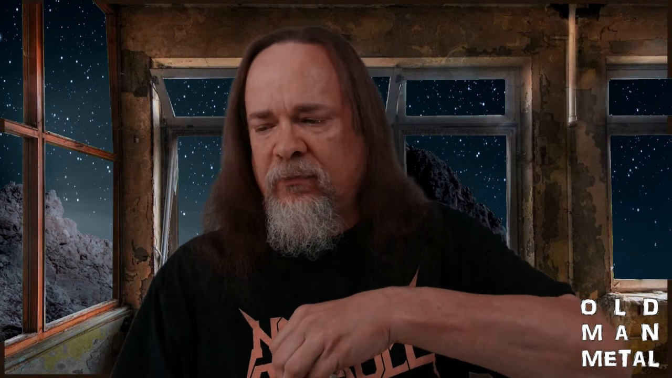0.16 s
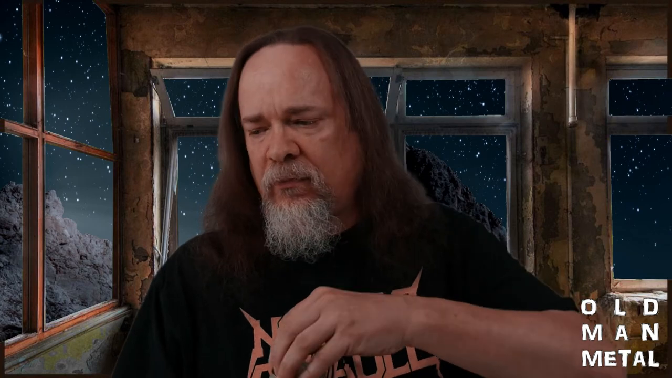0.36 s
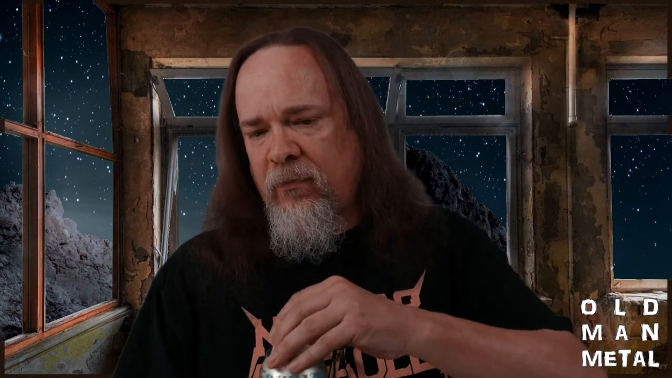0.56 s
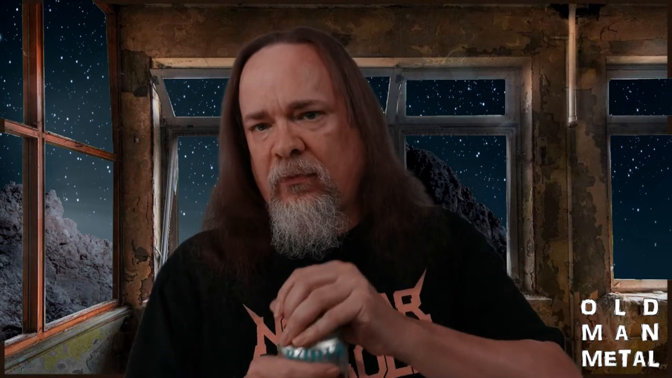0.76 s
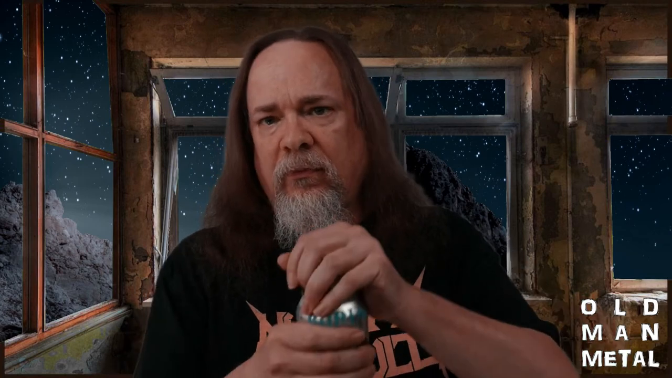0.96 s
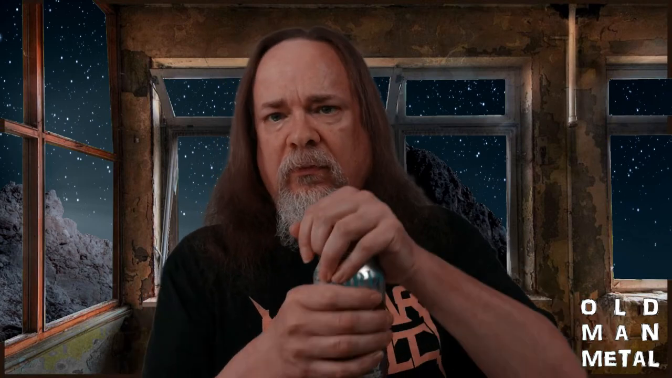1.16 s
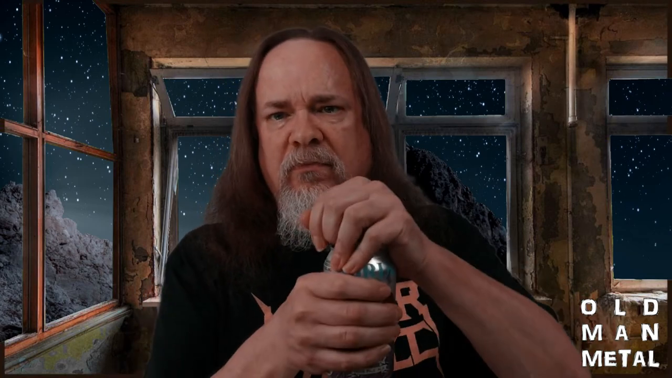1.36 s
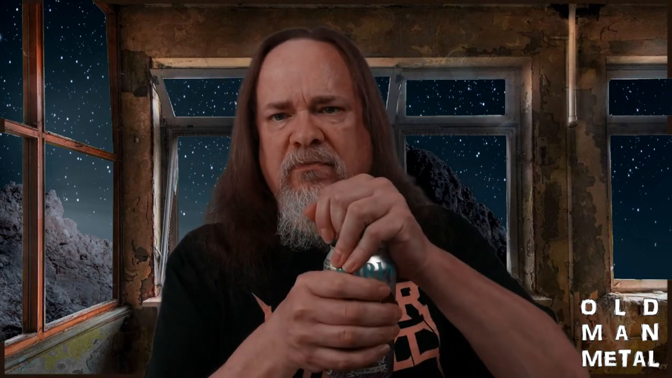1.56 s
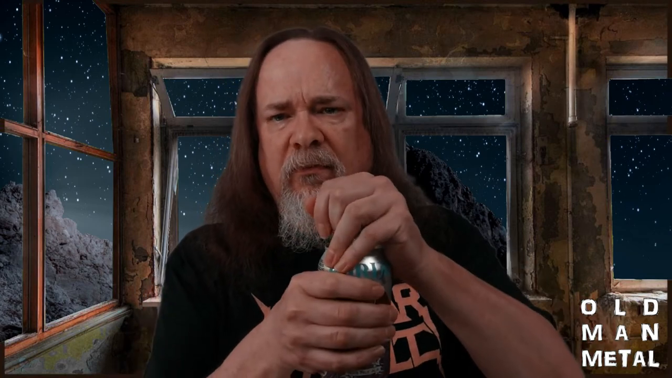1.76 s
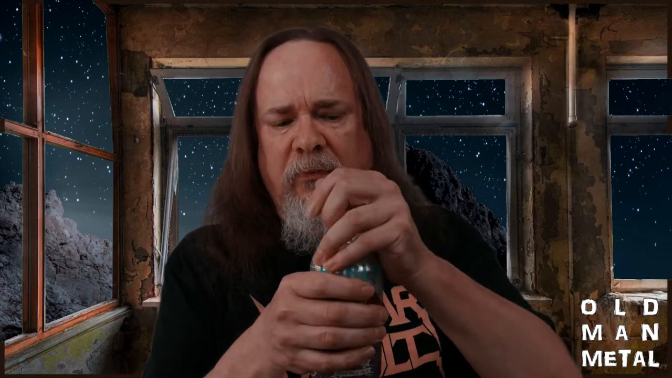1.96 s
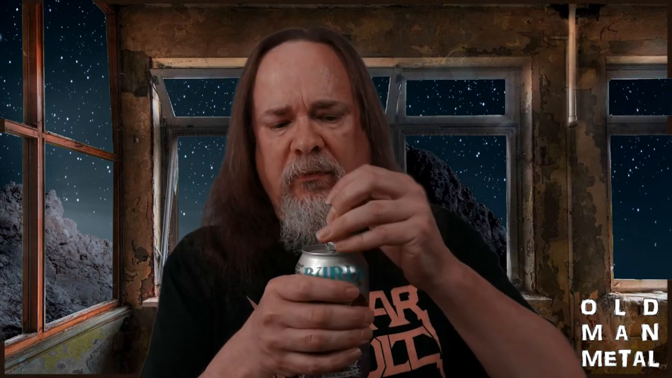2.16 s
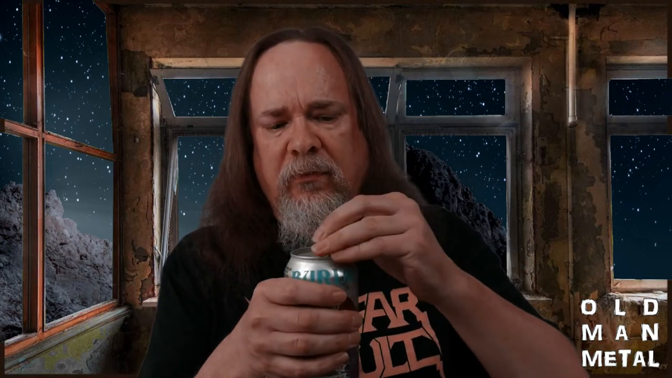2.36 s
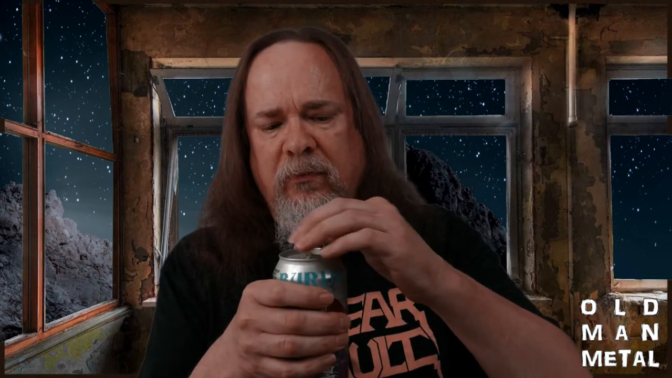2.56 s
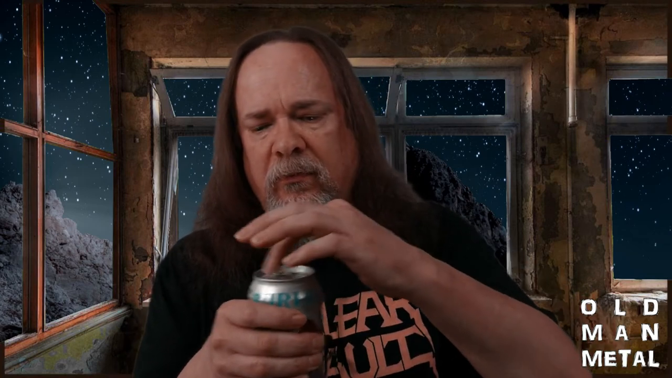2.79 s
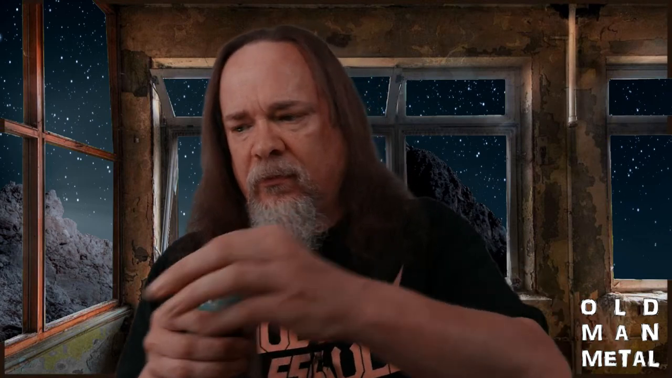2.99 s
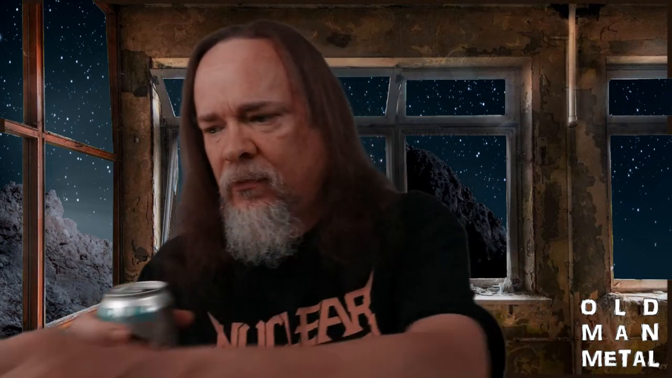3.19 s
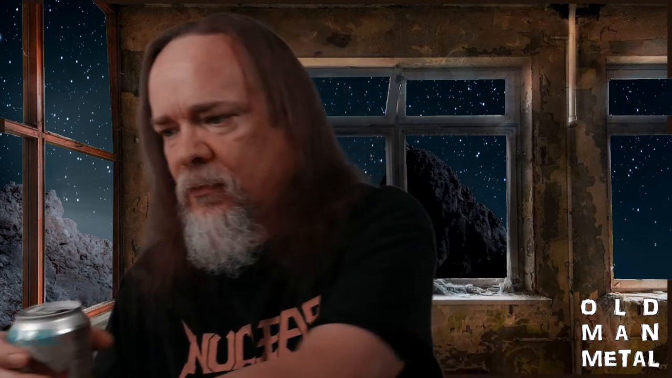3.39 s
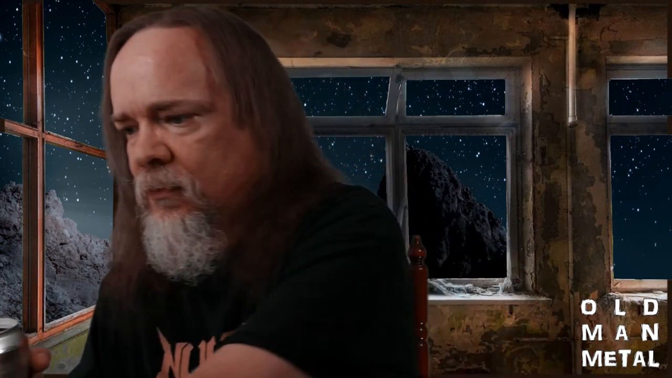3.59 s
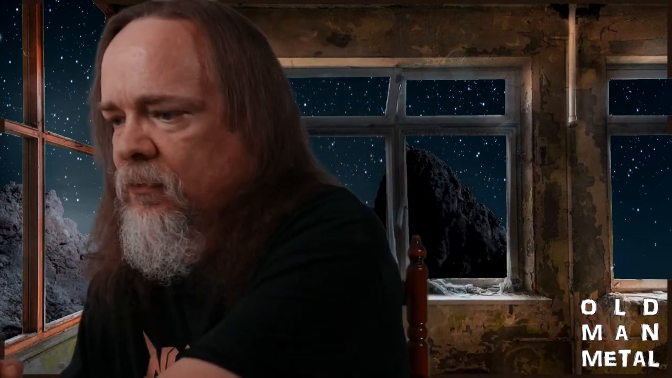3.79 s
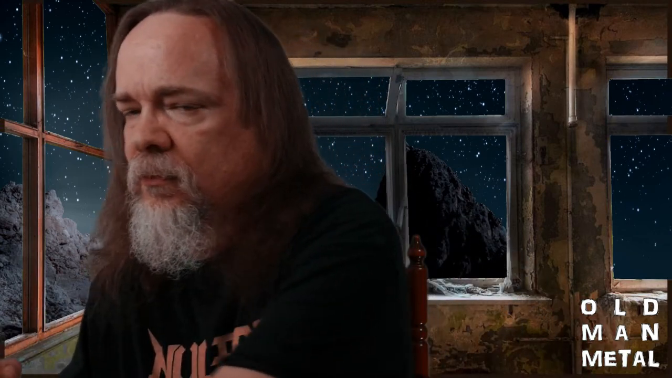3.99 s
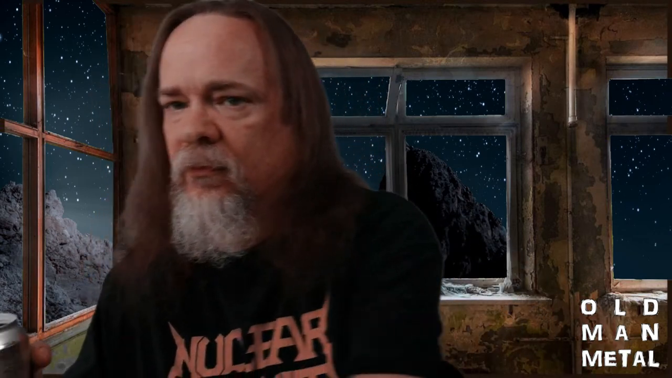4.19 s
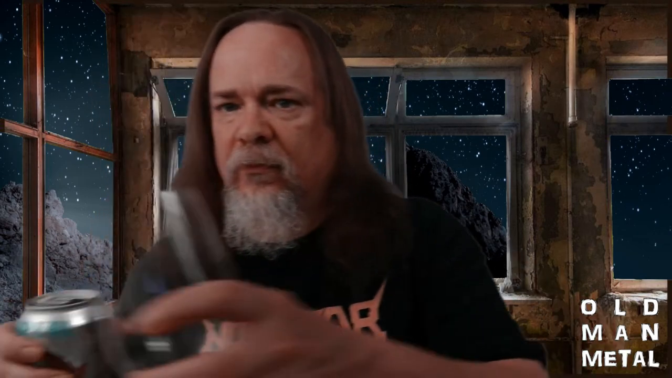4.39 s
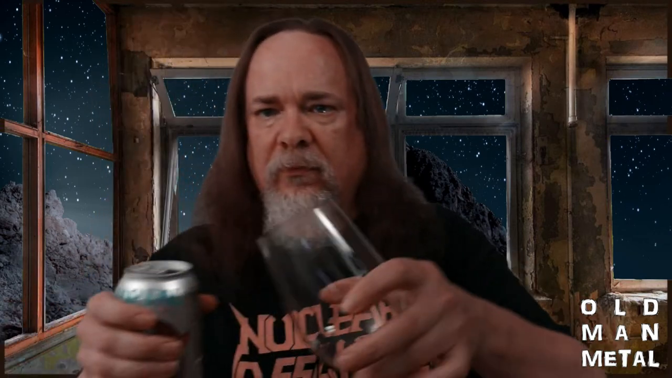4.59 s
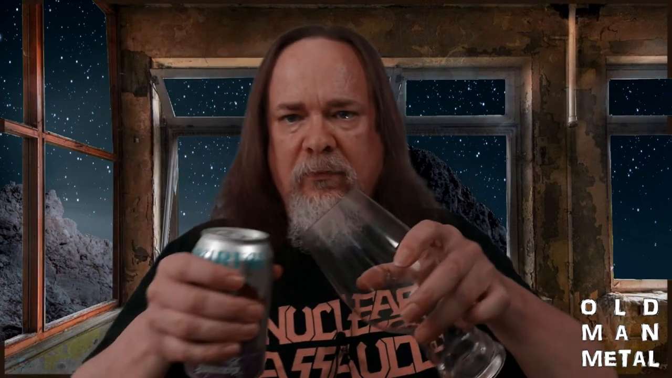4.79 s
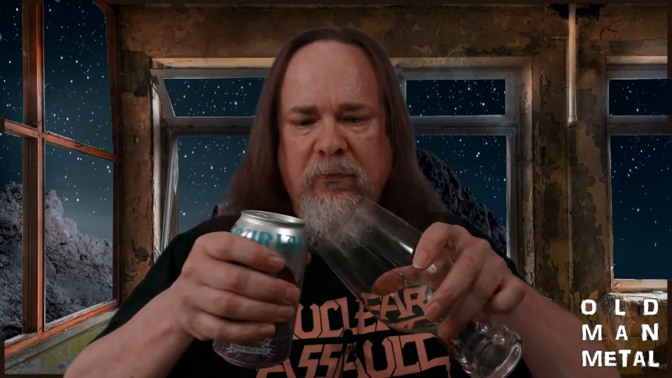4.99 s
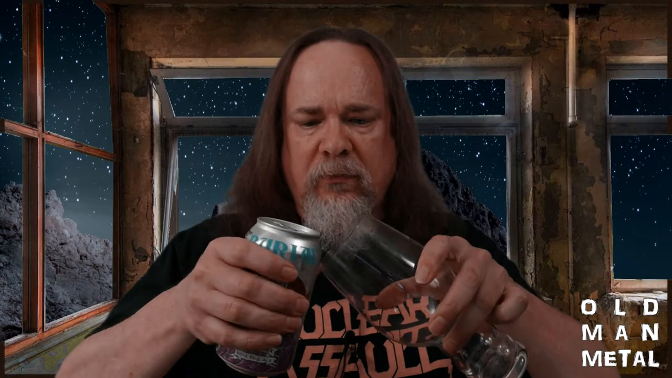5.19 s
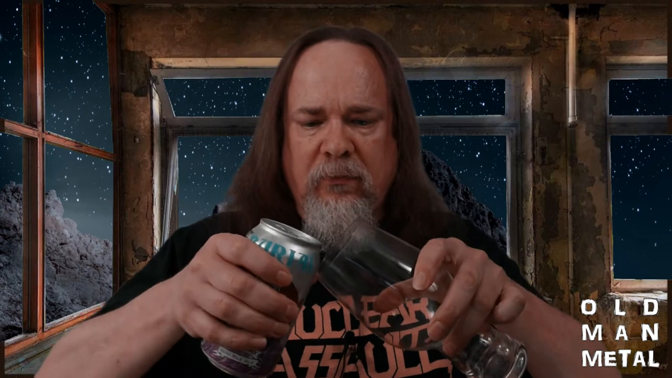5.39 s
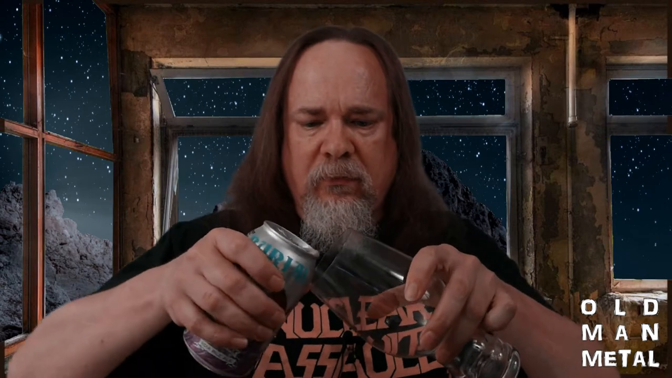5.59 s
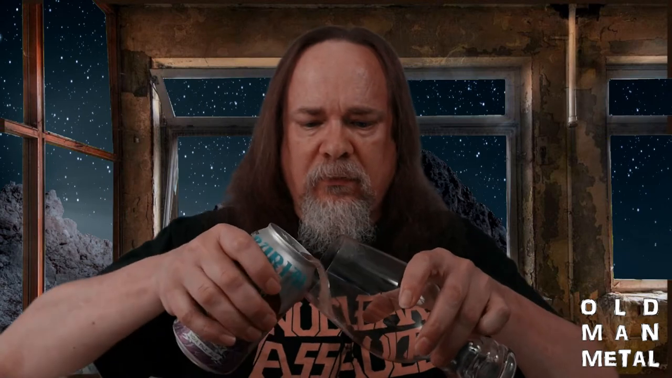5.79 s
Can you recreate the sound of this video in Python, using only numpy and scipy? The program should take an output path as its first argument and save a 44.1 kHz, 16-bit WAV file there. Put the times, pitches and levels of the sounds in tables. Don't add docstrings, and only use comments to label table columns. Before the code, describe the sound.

A quiet small room with low rumble and faint hiss, heard by two close microphones. From 0.3 s a fingernail ticks on a can tab; the strongest pluck, at 0.42 s, twangs brightly around 2 kHz. Weak touches follow at 0.67 and 0.83 s. At 1.45 s the vent cracks sharply with a gas jet lasting about 40 ms. From 1.55 to 1.63 s the lid tears in a rattling run of metallic cracks, loudest at 1.62 s, with fizz that dulls and dies by about 1.8 s; the background dips then returns. At 2.0 s the released tab gives a small hollow clunk, followed by faint bending clicks until 2.8 s. From 3.1 to 3.9 s a wooden chair creaks and knocks, duller and roomier, amid cloth rustle. Around 4.0-4.3 s a glass squeaks barely audibly; softer knocks come at 4.4-4.7 s, with one at 4.64 s clearest. A tiny finger tap sounds at 5.16 s, then faint rustling.

```python
import sys
import numpy as np
from scipy import signal
from scipy.fft import rfft, irfft, next_fast_len
from scipy.io import wavfile
from scipy.ndimage import uniform_filter1d, minimum_filter1d

SR = 44100
rng = np.random.default_rng(int(sys.argv[2]) if len(sys.argv) > 2 else 0)


def ratio_of_db(decibels):
    return 10 ** (np.asarray(decibels, float) / 20)


def store_wav(level_fs):
    pcm = np.round(np.clip(np.atleast_2d(level_fs), -1, 1) * 32767)
    wavfile.write(sys.argv[1], SR, pcm.T.astype(np.int16))


N = 257984


def rms_one(x):
    return x / np.sqrt(np.mean(x ** 2) + 1e-20)


def peak_one(x):
    return x / np.max(np.abs(x))


def add(out, s, sound):
    i = round(s * SR)
    out[i:i + len(sound)] += sound[:N - i]


def high_pass(x, order, hz):
    return signal.sosfilt(signal.butter(order, hz, "high", fs=SR, output="sos"), x)


def in_time(rows):
    s, *columns = np.transpose(rows)
    return [np.interp(np.arange(N) / SR, s, c) for c in columns]


def at_hz(points, hz):
    point_hz, value = np.transpose(points)
    return np.interp(np.log(hz), np.log(point_hz), value)


def coloured(spectrum, size):
    fast = next_fast_len(size)
    hz = np.arange(fast // 2 + 1) * SR / fast + 1e-3
    inside = (hz > spectrum[0][0]) & (hz < spectrum[-1][0])
    white = rfft(rng.standard_normal(fast))
    return rms_one(irfft(white * ratio_of_db(at_hz(spectrum, hz)) * inside, fast)[:size])


def drift(rate):
    knots = rng.standard_normal(400)
    return np.interp(np.arange(N) / SR * rate, np.arange(400), knots)


def swells(rows):
    t = np.arange(0, N / SR, .0005)
    power = 0
    for s, db, rise, fall in rows:
        power = power + ratio_of_db(2 * (db - np.where(t < s, rise * (s - t), fall * (t - s))))
    return np.interp(np.arange(N) / SR, t, 10 * np.log10(power + 1e-30))


def ring(force, hz, t60):
    r, w = ratio_of_db(-60 / (t60 * SR)), 2 * np.pi * hz / SR
    return signal.lfilter([0, np.sin(w)], [1, -2 * r * np.cos(w), r * r], force + 1e-18)


# frequency in Hz, level in dB.
LID_MODES = [(520, -6), (790, -2), (1100, -7.5), (1310, -2.5), (1480, -10.5), (1670, 2), (1860, -9.5),
             (2070, 9), (2280, -8), (2620, -4.5), (2900, -5.5)]
# frequency in Hz, level in dB.
RIM_MODES = [(4250, -5.5), (4650, -0.5), (5250, -3.5), (5900, -3), (6300, -0.5), (6880, -2.5), (7300, -2),
             (8000, -6), (8600, -4), (9500, -5), (10450, -5), (11350, -7), (12450, -8.5), (13450, -6.5)]
PANEL_TOP_HZ = 3100


def lid(force, ring_s, centre_hz, edge_hz, chance, tilt_db=0):
    panel, rim = 0, 0
    strength_db, detune = 2.5 * chance[:2], 1 + .012 * chance[2:]
    for k, (hz, db) in enumerate(LID_MODES):
        near_db = -12.0 * np.log2(hz / centre_hz) ** 2
        panel = panel + ratio_of_db(db + near_db + strength_db[0, k]) * ring(force, hz * detune[0, k], ring_s)
    for k, (hz, db) in enumerate(RIM_MODES):
        gain = ratio_of_db(db + tilt_db * np.log2(hz / 7000) + strength_db[1, k]) * (-1) ** k
        rim_ring_s = ring_s * 0.38 * (6000 / hz) ** 0.098
        rim = rim + gain * ring(force, hz * detune[1, k], rim_ring_s)
    panel = signal.sosfilt(signal.butter(4, PANEL_TOP_HZ, fs=SR, output="sos"), panel)
    rim = rim + ratio_of_db(5.5) * np.diff(force, n=2, prepend=[0, 0])
    return high_pass([panel, rim], 6, edge_hz)


def contacts(rows, panel_at, ring_s, snap, dull_hz):
    out, t = np.zeros(N), np.arange(3000) / SR
    soft = signal.butter(1, min(dull_hz, 20000), fs=SR, output="sos")
    for s, db, treble_db, contact_ms, tilt_db in rows:
        noise, chance = rng.standard_normal(3000), rng.standard_normal((4, 22))
        fade = np.exp(-(t * 750 / max(contact_ms, .05)) ** 1.5)
        force = signal.sosfilt(soft, np.where(t == 0, snap, noise) * fade)
        panel, rim = lid(force, ring_s, *panel_at(s, db), chance, tilt_db)
        add(out, s, ratio_of_db(db) * (peak_one(panel) + ratio_of_db(treble_db) * peak_one(rim)))
    return out


# start in seconds, lid peak in dB, treble above lid in dB, contact in ms, treble tilt in dB/octave.
VENT_CRACK = [
    (1.4481, -16, 6.5, 0.2, -3),
]


def vent_crack():
    return contacts(VENT_CRACK, lambda s, db: (1900, 1400), 0.011, snap=9.0, dull_hz=16000)


# start in seconds, lid peak in dB, treble above lid in dB, contact in ms, treble tilt in dB/octave.
TEAR = [(1.5463, -24.5, 1.5, 5, -1.5), (1.5542, -18, 5, 0.66, 1.5), (1.5625, -21, -1, 2.9, 1.5),
        (1.5735, -28.5, 3, 2.8, -5), (1.5802, -17, 1.5, .7, -3), (1.5857, -19, -2.5, 2.3, -3.5),
        (1.6050, -20, -4.5, 1.5, -4), (1.6168, -13, -1.5, 3.5, -1), (1.6212, -8, -2.5, 0.72, -0.46),
        (1.6238, -6, 2.5, 1.4, -2.5), (1.6318, -21, 0.5, 2.1, -3.5), (1.6575, -29, -7.5, 1.9, -4.5),
        (1.7412, -43, -1.5, 1.2, -12.5)]


def tear():
    def slack_panel(s, db):
        return 1900, 640 * (1 - .05 * db)
    return contacts(TEAR, slack_panel, .0095, snap=13.0, dull_hz=16000)


# start in seconds,
# lid peak in dB, treble above lid in dB, contact in ms, treble tilt in dB/octave.
NAIL = [(0.293, -56, -9, 2.5, -5), (0.3455, -46, 5, .6, 1.5), (0.3567, -59, 12, 3.3, -23),
        (0.368, -50, 7, 3.5, -1.5), (0.3838, -44, 6, .7, 3), (0.4202, -30.5, 9, 2.2, 0.2),
        (0.4467, -44, -4, 10, -20), (0.6694, -41.5, 1, 1.7, -11), (0.8295, -48, -14, 3.1, -3),
        (0.8344, -48.5, 5, 2, -1), (0.8864, -58, -14, 7.5, -4)]
BEND = [(1.8324, -61, -11, 0.88, -1.5), (2.0612, -50.5, 1.5, 1.87, 9), (2.1021, -54, -2, 1.64, 7),
        (2.4221, -32, -36, 0.45, 2), (2.4334, -46, -16, 11, 3.5), (2.5628, -55, -20, .6, -1.5),
        (2.572, -53, -17, .6, -3), (2.6764, -43, -9, 1.5, -.7), (2.692, -50.5, 5.5, 1.8, 11),
        (2.7028, -47, -3, 1.5, 10), (2.7686, -38.5, -11.5, 1.1, 1), (2.8292, -58.5, -3.5, 1.9, -1.5)]
TOUCH = [
    (1.9963, -46, -7, 2.1, 8),
    (5.1613, -51, 2, 2.14, 9.5),
    (5.1652, -47.5, -15.5, 0.37, -3),
    (5.1671, -49, -13, 0.44, -3),
    (5.1693, -48, -13, .4, -3),
]


def finger_taps():
    nail = contacts(NAIL, lambda s, db: (2200, 290), 0.014, snap=4.0, dull_hz=15000)
    bend = contacts(BEND, lambda s, db: (2250, 1510), 0.02, snap=11.6, dull_hz=7190)
    touch = contacts(TOUCH, lambda s, db: (1950, 1080), .011, snap=3.8, dull_hz=9000)
    return nail + bend + touch


# start in seconds, rms at the start in dB, decay in ms.
SNAPS = [(.3455, -46, 1.2), (.3685, -52, 4), (.3838, -44, 1.2), (.4208, -31, 2), (1.4481, -13, 1.6),
         (1.4503, -21, 2), (1.5463, -30, 3), (1.5542, -18, 1.8), (1.5625, -30, 2.5), (1.5802, -21, 1.5),
         (1.586, -26, 3), (1.6052, -28, 2), (1.6168, -22, 3), (1.6208, -20, 2), (1.6236, -12.5, 2.2),
         (1.632, -29, 5), (1.6415, -34, 3)]


def snaps():
    out, t = np.zeros(N), np.arange(1500) / SR
    band = signal.butter(2, [3700, 11500], "band", fs=SR, output="sos")
    for s, db, ms in SNAPS:
        burst = rms_one(signal.sosfilt(band, rng.standard_normal(1500)))
        add(out, s, ratio_of_db(db) * burst * np.exp(-t * 1000 / ms))
    return out


# peak time in seconds, peak in dB, rise in dB/s, fall in dB/s.
RUBS = [(0.3, -81, 650, 300), (0.36, -66, 301, 260), (.4205, -42, 3000, 1300), (0.39, -62, 900, 500),
        (0.45, -57, 153, 700), (0.67, -57.5, 1800, 650), (0.81, -70, 1100, 600), (2.058, -67, 500, 400),
        (0.663, -66, 700, 400)]
STRAIN = [
    (1.475, -45.5, 401.5, 91),
    (1.55, -37, 901, 249),
    (1.585, -38.5, 400, 297),
    (1.63, -35, 399, 400),
]
RUB_TREBLE_DB, STRAIN_TREBLE_DB = 3.5, -9
HANDS_OFF_S, SLIPS_PER_S = 2.3, 2500


def grind():
    size = round(HANDS_OFF_S * SR)
    sizes = ratio_of_db(4.5 * np.minimum(rng.exponential(1, size), 3)) * rng.choice([-1, 1], size)
    slips = sizes * (rng.random(size) < SLIPS_PER_S / SR)
    panel, rim = lid(slips, 0.019, 1600, 460, np.zeros((4, 22)))
    rub, strain = ratio_of_db(swells(RUBS)[:size]), ratio_of_db(swells(STRAIN)[:size])
    treble = rub * ratio_of_db(RUB_TREBLE_DB) + strain * ratio_of_db(STRAIN_TREBLE_DB)
    return np.pad((rub + strain) * rms_one(panel) + treble * rms_one(rim), (0, N - size))


# time in seconds, jet level in dB.
VENT = [
    (1.421, -103),
    (1.427, -43),
    (1.446, -31.5),
    (1.451, -22.5),
    (1.468, -26.5),
    (1.480, -30.5),
    (1.491, -46),
    (1.52, -57.5),
    (1.56, -76.5),
]
# frequency in Hz, level in dB per Hz.
LEAK = [(300, -26), (800, -20), (1400, -1.5), (3000, -2.5), (4500, -5.5), (7000, -1.5), (10000, -1.5),
        (16000, -2.5)]
JET = [(760, -35), (1300, -7), (2170, -4.5), (3640, -18), (4540, -13), (5900, -7.5), (6220, -4.5),
       (6910, -15), (8700, -1), (11200, -15.5), (12800, -13), (16000, -12)]
# peak time in seconds, peak in dB, rise in dB/s, fall in dB/s.
GURGLE = [
    (1.468, -41, 1200, 500),
]
PUFF_DB, PUFF_FOLLOWS, PUFF_LAG_S = -41, 0.77, 0.0016


def vent():
    jet_db, = in_time(VENT + [(VENT[-1][0] + .02, -120)])
    puff_db = PUFF_DB + PUFF_FOLLOWS * (np.roll(jet_db, round(PUFF_LAG_S * SR)) + 24.5)
    before_crack = np.arange(N) < VENT_CRACK[0][0] * SR
    jet = np.where(before_crack, coloured(LEAK, N), coloured(JET, N))
    puff = coloured([(30, -6), (95, -10), (200, -6.5), (330, -14), (600, -28)], N)
    gurgle = ratio_of_db(swells(GURGLE)) * coloured([(300, -3), (600, -1.5), (1200, -4)], N)
    return ratio_of_db(jet_db) * jet + ratio_of_db(puff_db) * puff + gurgle


# frequency in Hz, level in dB per Hz.
FIZZ = [(260, -56.5), (450, -26), (792, -6.5), (1180, -13), (1880, -3), (2770, -13.5), (3900, -9.5),
        (5170, -17), (9520, -12.5), (13800, -22), (16300, -30)]
FROTH_START_S, FROTH_START_MS, FROTH_PEAK_S = 1.515, 45, 1.625
PATCHY_DB, SPLIT_HZ, TREBLE_LOSS_DB_PER_S = 3.5, 7300, 120


def froth():
    t = np.arange(N) / SR
    start = np.clip((t - FROTH_START_S) * 1000 / FROTH_START_MS, 0, 1) ** 2
    fizz = coloured(FIZZ, N)
    low = signal.sosfiltfilt(signal.butter(2, SPLIT_HZ, fs=SR, output="sos"), fizz)
    treble_db = PATCHY_DB * drift(90) - TREBLE_LOSS_DB_PER_S * np.maximum(t - FROTH_PEAK_S, 0)
    fizz = ratio_of_db(PATCHY_DB * drift(66)) * low + ratio_of_db(treble_db) * (fizz - low)
    level_db = swells([(FROTH_PEAK_S, -32.5, 102.5, 190)])
    return start * ratio_of_db(level_db) * fizz


def lone_modes(rows, rise_ms, curve, edge_hz, rough_hz=0, glide_per_s=0):
    out, t = np.zeros(N), np.arange(12000) / SR
    for s, db, hz, t60 in rows:
        envelope = (1 - np.exp(-t * 1000 / rise_ms)) * ratio_of_db(-60 * (t / t60) ** curve)
        wander = np.cumsum(rng.standard_normal(len(t))) * np.sqrt(2 * np.pi * rough_hz / SR)
        tone = np.sin(2 * np.pi * hz * t * (1 + glide_per_s * t) + wander)
        add(out, s, ratio_of_db(db) * high_pass(envelope * tone, 4, edge_hz))
    return out


# start in seconds, peak in dB, frequency in Hz, t60 in seconds.
TWANG = [(.3842, -34.5, 1950, 0.049), (.4205, -23.5, 1948, 0.056), (.4205, -30.5, 1954, 0.11),
         (.669, -40, 2240, 0.024), (2.0595, -45, 1910, 0.097), (2.1025, -51, 1900, 0.054),
         (2.768, -39, 2080, 0.03), (.886, -54, 1927, 0.066), (1.9958, -35, 2030, .012),
         (1.9962, -44, 1600, .015)]
OVERTONE = [
    (.29, -60.5, 4260, 0.036),
    (.3458, -41, 4070, 0.017),
    (.4215, -25, 4160, 0.016),
    (.835, -50.5, 4414, 0.032),
    (.884, -57, 4150, 0.078),
]


def tab_tones():
    twang = lone_modes(TWANG, rise_ms=1, curve=1, edge_hz=900)
    return twang + lone_modes(OVERTONE, rise_ms=0.3, curve=1.4, edge_hz=1500, rough_hz=232)


# start in seconds, peak in dB, frequency in
# Hz, t60 in seconds.
VENT_CRACK_MODES = [(1.4481, -11.5, 1720, .014), (1.4482, -8, 2106, .014), (1.4481, -16, 2780, .007),
                    (1.4481, -6, 5400, .01), (1.4492, -15, 4600, .011), (1.4481, -10, 6250, .008),
                    (1.4481, -13, 7350, .008), (1.4481, -14, 9200, .007), (1.4504, -17, 8200, .006),
                    (1.4555, -25, 2050, .028)]
PINGS = [(2.006, -55, 2100, .03), (2.4225, -49, 2884, 0.019), (2.6766, -50, 2928, 0.009),
         (2.6922, -52, 2928, .009), (2.7688, -49, 2880, .01), (1.605, -17, 1670, 0.014),
         (1.605, -17, 2070, 0.012), (1.5543, -13, 2045, 0.016), (1.5802, -13, 2075, 0.016),
         (5.165, -57.5, 2510, 0.021), (1.9965, -44.5, 1160, 0.018), (.446, -48, 5370, .02),
         (.4215, -33, 6050, 0.021), (1.5465, -25, 1710, .02), (1.5465, -24, 4690, .014),
         (1.5543, -12, 4560, 0.0095), (1.5543, -15, 1660, .018), (1.5545, -19.5, 10380, .006),
         (1.5545, -19, 13460, .006), (1.5625, -29, 9570, .013), (1.5625, -27, 10700, .008),
         (1.5725, -30.5, 4350, .03), (1.5735, -31, 6870, .015), (1.5735, -31.5, 1614, .04),
         (1.5802, -11, 1680, 0.016), (1.5801, -15, 4530, 0.011), (1.586, -16, 1680, .02),
         (1.5853, -17, 6310, 0.013), (1.6052, -26, 6390, .012), (1.617, -10, 2013, .017),
         (1.6172, -21.5, 5990, .015), (1.6172, -23, 9450, .015), (1.6212, -6, 2110, .012),
         (1.6205, -18, 7280, .014), (1.6236, -4, 2090, 0.009), (1.6239, -7, 8610, 0.011),
         (1.624, -11, 7300, .008), (1.6238, -13, 4680, .008), (1.632, -22, 2067, .018),
         (1.657, -35, 1290, .035), (1.7412, -46, 1356, .03), (2.692, -50, 2121, .03),
         (5.1613, -48.5, 6500, .012), (5.1613, -56, 7560, .02)]
TAP_MODES = [(.3578, -47, 4100, .012), (.3705, -48, 4150, .014), (.3845, -46, 7250, .014),
             (.3843, -42, 10100, .007), (.3456, -45, 11700, .006), (2.0612, -55, 2750, .015),
             (2.0612, -57, 4150, .012), (2.4223, -43, 2400, .009), (2.4345, -50, 2380, .02),
             (2.6766, -49, 2450, .008), (2.6922, -51, 2600, .008), (2.7688, -45, 2480, .01),
             (2.563, -56, 1500, .012), (2.6766, -56, 4600, .012), (2.7688, -57, 4750, .01)]
TEAR_MODES = [(1.556, -27, 6400, .02), (1.5575, -25, 4700, .008), (1.5868, -22, 4400, .012),
              (1.5878, -28, 8150, .011), (1.5862, -28, 9800, .007), (1.6237, -15, 2900, .007),
              (1.6212, -17, 2480, .008), (1.6205, -24, 3720, .012), (1.6195, -24, 1085, .02),
              (1.6322, -30, 7250, .012), (1.6322, -31, 9400, .01), (1.6405, -27, 2000, .012),
              (1.647, -34, 2050, .022), (1.6052, -25, 4400, .008), (1.6215, -22, 560, .03),
              (1.5885, -19, 1950, .012), (1.6075, -23, 1900, .008)]


def lid_pings():
    crack = lone_modes(VENT_CRACK_MODES, rise_ms=.12, curve=1.2, edge_hz=1350, rough_hz=25.0)
    pings = PINGS + TAP_MODES + TEAR_MODES
    return crack + lone_modes(pings, rise_ms=.2, curve=1.45, edge_hz=950, rough_hz=110.0)


# start in seconds, peak in dB, frequency in Hz, t60 in seconds.
AIR = [
    (1.619, -21.5, 783, 0.036),
    (1.6195, -29, 433, 0.02),
    (1.9975, -34.5, 502, 0.15),
    (1.9983, -31, 607.5, 0.049),
    (2.424, -47, 540, 0.041),
    (5.161, -52, 503, 0.056),
]


def can_air():
    return lone_modes(AIR, rise_ms=2.1, curve=1.2, edge_hz=300)


# start in seconds, peak in dB, frequency in Hz, t60 in seconds.
BODY = [(.4205, -43, 102, 0.039), (.4205, -44, 252, 0.033), (.4205, -47, 667, 0.028),
        (.4205, -27, 1140, 0.014), (1.4475, -30, 190, .015), (3.857, -43, 150, 0.084),
        (3.86, -44.5, 340, .08), (3.665, -46, 230, .06), (4.639, -50, 950, .04), (4.641, -56, 1200, .035),
        (4.64, -49, 600, .04), (4.66, -59, 1180, .04), (3.14, -51, 640, .03), (3.846, -48, 1450, .03)]


def bodies():
    return lone_modes(BODY, rise_ms=0.19, curve=1.4, edge_hz=40)


# start in seconds, peak in dB, frequency in Hz, t60 in seconds.
GLASS = [
    (4.0, -69.5, 4450, 0.12),
    (4.29, -63, 3540, 0.23),
    (4.2, -66, 3550, .2),
]


def glass():
    return lone_modes(GLASS, rise_ms=22.2, curve=1.4, edge_hz=1500, rough_hz=116, glide_per_s=0.4)


# start in seconds, peak in dB, band above 2 kHz in dB, slip in ms,
# struck part of the frame in Hz.
KNOCKS = [(0.92, -66, -21, 4.9, 891), (3.141, -47, -19, 3.9, 650), (3.417, -51, -12, 7.2, 687),
          (3.45, -33, -26, 6.1, 587), (3.498, -43.5, -22, 7.4, 1152), (3.555, -35.5, -21, 8, 624),
          (3.652, -29.5, -16.5, 7.3, 936), (3.692, -55, -22, 6.7, 1110), (3.794, -33.5, -17.5, 8, 565),
          (3.842, -31.5, -24, 6, 956), (4.443, -50, -24, 8.7, 614), (4.515, -53, -13, 6.5, 587),
          (4.638, -36, -26, 5.5, 700), (4.719, -61.5, -12, 9.6, 495), (4.661, -51.5, -27.5, 9, 1200)]
# frequency in Hz, width in Hz, level in dB.
CHAIR = [(151.7, 16.3, 0), (348, 14.6, -6), (495, 230, -24), (737, 1400, 15.5), (1108, 190, 7),
         (1440, 500, 1.5), (1830, 2900, -2), (2130, 300, -39), (3400, 980, -13)]


def chair():
    out, t = np.zeros(N), np.arange(6000) / SR
    edge = signal.butter(2, [1800, 9000], "band", fs=SR, output="sos")
    for s, db, bright_db, slip_ms, part_hz in KNOCKS:
        noise, spread_db = rng.standard_normal(6000), 1.5 * rng.standard_normal(12)
        fade = np.exp(-(t * 1000 / max(2.58 * slip_ms, 1)) ** 1.8)
        force = noise * np.minimum(t / 0.00084, 1) * fade
        frame = 0
        for k, (hz, width, level_db) in enumerate(CHAIR):
            near_db = -0.56 * np.log2(hz / part_hz) ** 2
            gain = ratio_of_db(level_db + spread_db[k] + near_db) * np.sqrt(width) * (-1) ** k
            frame = frame + gain * ring(force, hz, 2.12 / width)
        frame = high_pass(frame, 2, 110)
        bright = peak_one(signal.sosfilt(edge, force))
        add(out, s, ratio_of_db(db) * (peak_one(frame) + ratio_of_db(bright_db) * bright))
    return out


# peak time in seconds, peak in dB, rise in dB/s, fall in dB/s.
MOVES = [(.57, -63, 27, 39), (1.35, -65.5, 6, 13.5), (3.5, -55, 23, 42), (3.82, -54, 330, 249.5),
         (3.67, -57, 200, 120.5), (4.55, -61, 11.5, 15.5), (5.85, -61.5, 23, 18)]
SHIFTS = [
    (.66, -60, 30, 99),
    (3.36, -64.5, 40, 60.5),
    (3.87, -56.5, 200, 128.5),
    (5.7, -60.5, 42, 15),
]
# frequency in Hz, level in dB per Hz.
CLOTH = [(90, 5), (200, 0.5), (340, -2.5), (480, -1), (700, -5), (1200, -9.5), (2000, -27.5)]
CLOTH_BRIGHT = [(900, -12), (1500, -4.5), (2600, -7), (4000, -12.5), (8000, -16), (14000, -22)]
STILL_DB, BRIGHT_DB, BRIGHT_FOLLOWS = -75, -68.5, 0.96
SEAT_HUM_HZ, SEAT_HUM_WIDTH_HZ = 344, 67


def clothes():
    low_db = 20 * np.log10(np.hypot(ratio_of_db(swells(MOVES)), ratio_of_db(STILL_DB)))
    bright_db = BRIGHT_DB + BRIGHT_FOLLOWS * (low_db + 61.5)
    seat = rms_one(ring(rng.standard_normal(N), SEAT_HUM_HZ, 2.2 / SEAT_HUM_WIDTH_HZ))
    hum = ratio_of_db(swells(SHIFTS)) * seat
    flutter_db = 1.5 * drift(30)
    low = np.array([coloured(CLOTH, N), 0.044 * coloured(CLOTH, N)])
    bright = np.array([coloured(CLOTH_BRIGHT, N), 0.24 * coloured(CLOTH_BRIGHT, N)])
    mid, side = ratio_of_db(low_db + flutter_db) * low + ratio_of_db(bright_db + flutter_db) * bright
    return mid + hum + side * np.array([[1], [-1]])


# frequency in Hz, level in dB per Hz.
FLOOR = [(15, -2), (28, 2), (60, -5.5), (130, -13), (400, -20.5), (1600, -25.5), (3300, -31), (6300, -32),
         (13000, -30.5), (15800, -28)]
# frequency in Hz, side minus mid in dB.
FLOOR_SIDE = [(60, -23), (110, -17.5), (200, -20), (380, -16), (700, -11.5), (1290, -17), (2380, -11.5),
              (4400, -6), (8120, -6.5), (15000, -8)]
FLOOR_DB = -62


def floor():
    hz = np.arange(N // 2 + 1) * SR / N + 1
    side = irfft(rfft(coloured(FLOOR, N)) * ratio_of_db(at_hz(FLOOR_SIDE, hz)), N)
    return ratio_of_db(FLOOR_DB) * (coloured(FLOOR, N) + side * np.array([[1], [-1]]))


# frequency in Hz, level in dB.
SPREAD = [(60, -25.5), (250, -14), (550, -15.5), (1200, -23.5), (4000, -18), (9000, -15.5), (14000, -10)]
SPREAD_MS = 3.0


def capsules(x):
    hz = np.arange(N // 2 + 1) * SR / N + 1
    scatter = rng.standard_normal(900) * np.exp(-np.arange(900) / SR * 1000 / SPREAD_MS)
    scatter = scatter / np.sqrt(np.sum(scatter ** 2))
    side = irfft(rfft(x) * rfft(scatter, N) * ratio_of_db(at_hz(SPREAD, hz)), N)
    return x + side * np.array([[1], [-1]])


# frequency in Hz, t60 in seconds.
ROOM_T60 = [(150, 0.12), (1000, 0.28), (4000, 0.28), (8000, 0.21), (14000, 0.07)]


def room(x, delay_s, width):
    t, tail = np.arange(16000) / SR, 0
    for hz in 180 * 2. ** np.arange(7):
        band = signal.butter(2, [hz / np.sqrt(2), hz * np.sqrt(2)], "band", fs=SR, output="sos")
        noise = signal.sosfilt(band, rng.standard_normal((2, 16000)))
        tail = tail + noise * ratio_of_db(-60 * t / at_hz(ROOM_T60, hz))
    tail = tail * np.clip(t / delay_s, 0, 1) ** 2
    tail = tail / np.sqrt(np.sum(tail ** 2) / 2)
    mid, side = signal.fftconvolve(x[None], tail, axes=1)[:, :N]
    return mid + width * side * np.array([[1], [-1]])


DUCK_S, DUCK_ATTACK_S, DUCK_HOLD_S, DUCK_RELEASE_S = 1.4, 0.05, 0.15, 0.33
DUCK_DB, SETTLES_DB = -17.5, 0.5


def ducking():
    s = DUCK_S + np.cumsum([0, DUCK_ATTACK_S, DUCK_HOLD_S, DUCK_RELEASE_S])
    return in_time(np.transpose([s, [0, 1, 1, 0], [0, 0, 0, 1]]))


def scene():
    can = vent_crack() + tear() + finger_taps() + snaps() + grind() + vent() + froth()
    tones = tab_tones() + lid_pings() + can_air() + bodies() + glass()
    seat = chair()
    near = capsules(can + tones) * ratio_of_db(np.array([[-.3], [.3]])) + ratio_of_db(-24.5) * room(can, 0.0057, 0.27)
    far = capsules(seat) * ratio_of_db(np.array([[-.6], [.6]])) + ratio_of_db(-14.0) * room(seat, 0.019, 0.025)
    down, back = ducking()
    rustle = ratio_of_db(DUCK_DB * down) * clothes()
    background = ratio_of_db(0.37 * DUCK_DB * down + SETTLES_DB * back) * floor()
    return near + far + rustle + background


def band_limit(x):
    return signal.sosfilt(signal.butter(12, 16660, fs=SR, output="sos"), x)


def record(dry):
    x = signal.sosfilt(signal.cheby2(12, 70, 16900, fs=SR, output="sos"), dry)
    size = round(5 * SR / 1000) // 2 * 2 + 1
    needed = 1 / np.maximum(np.abs(x).max(axis=0), 1)
    gain = uniform_filter1d(minimum_filter1d(needed, size), size)
    return band_limit(x * gain)


dry = scene()
out = record(dry)
store_wav(out)
```